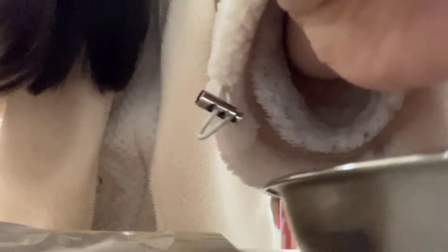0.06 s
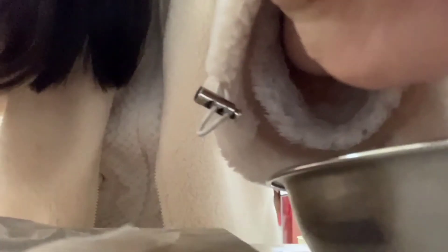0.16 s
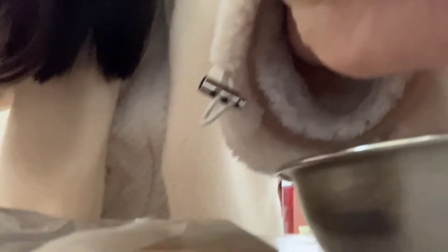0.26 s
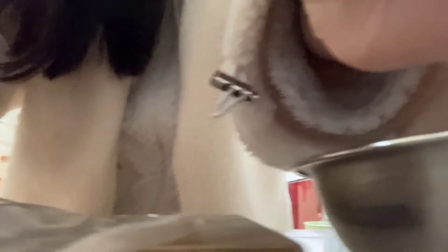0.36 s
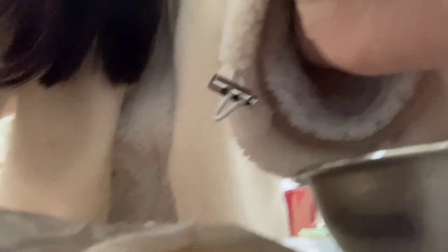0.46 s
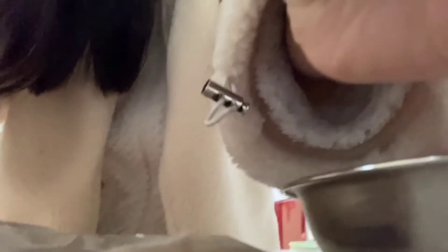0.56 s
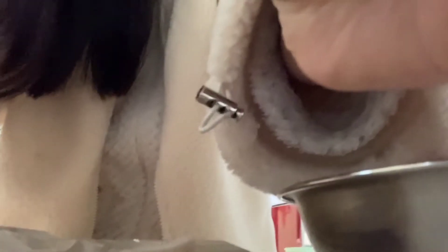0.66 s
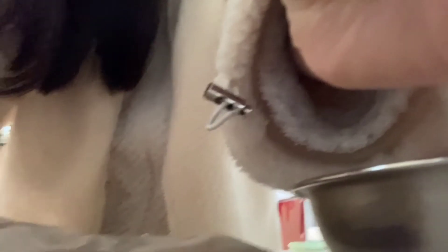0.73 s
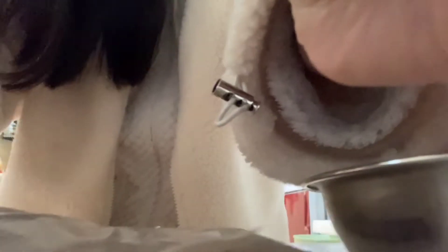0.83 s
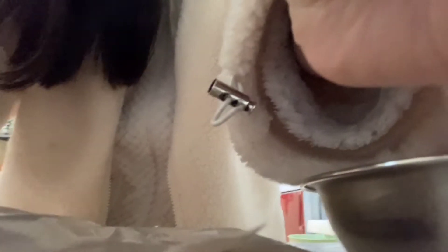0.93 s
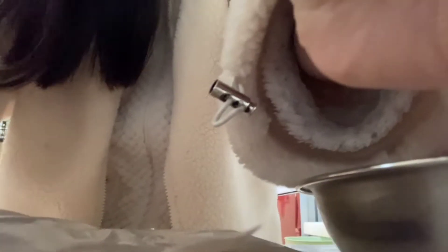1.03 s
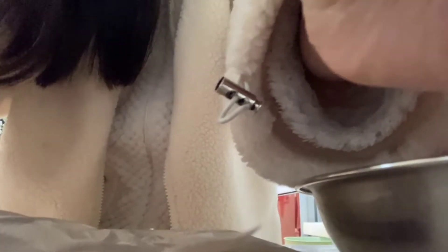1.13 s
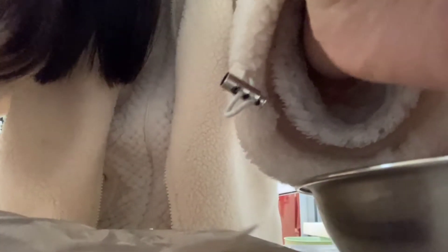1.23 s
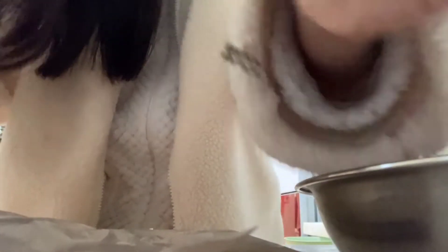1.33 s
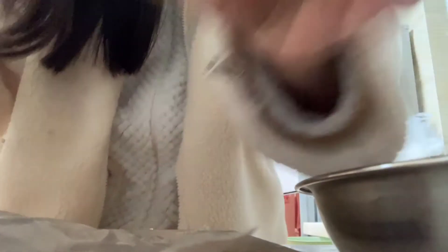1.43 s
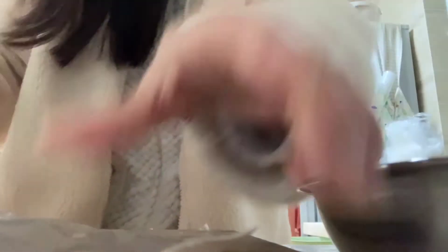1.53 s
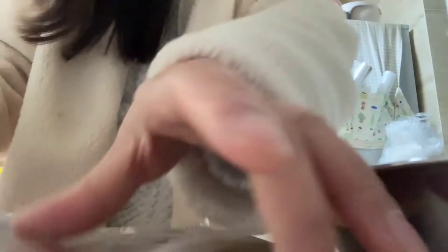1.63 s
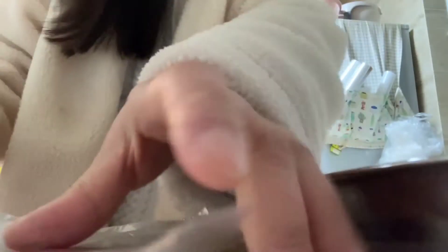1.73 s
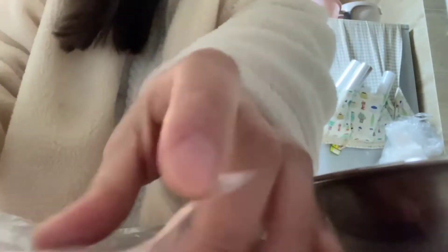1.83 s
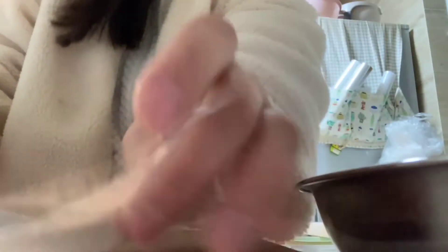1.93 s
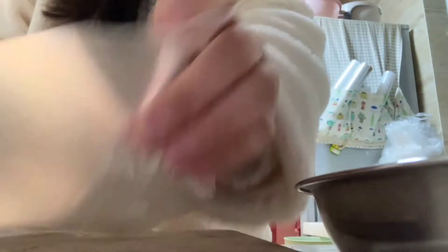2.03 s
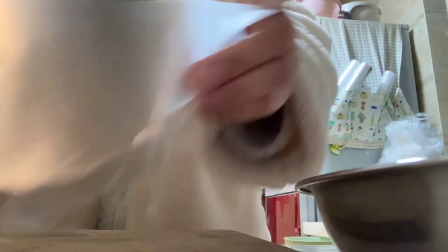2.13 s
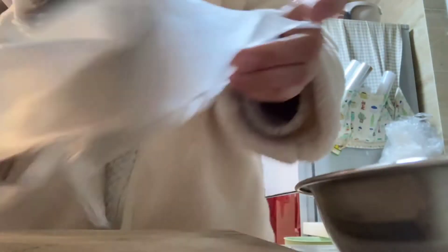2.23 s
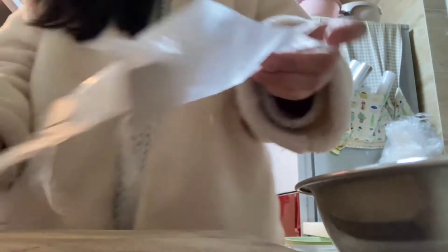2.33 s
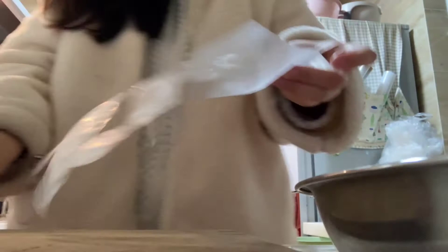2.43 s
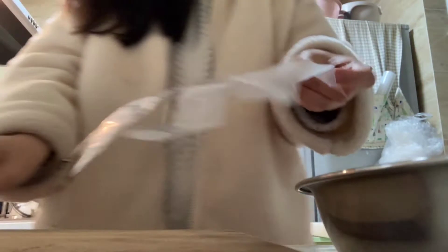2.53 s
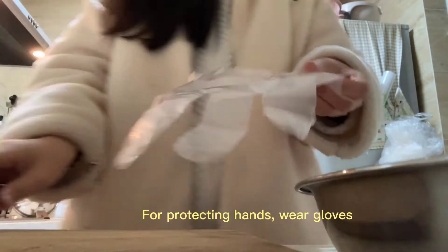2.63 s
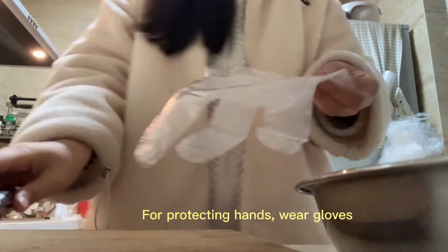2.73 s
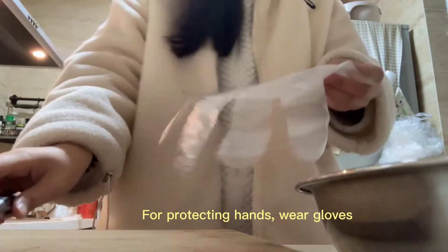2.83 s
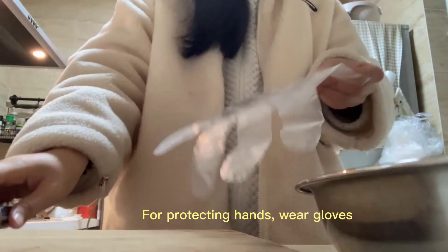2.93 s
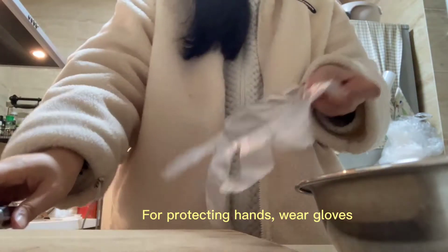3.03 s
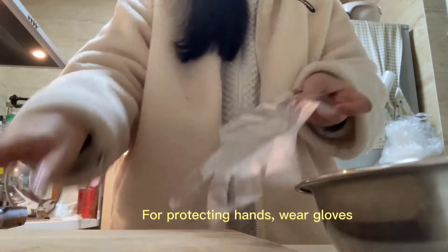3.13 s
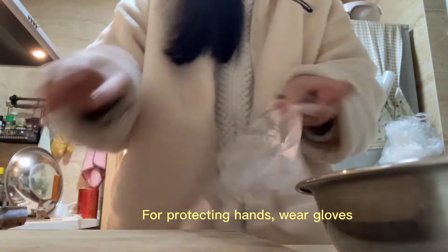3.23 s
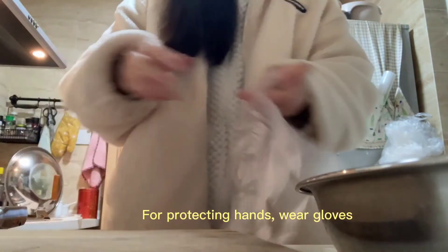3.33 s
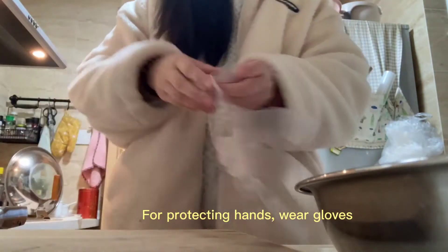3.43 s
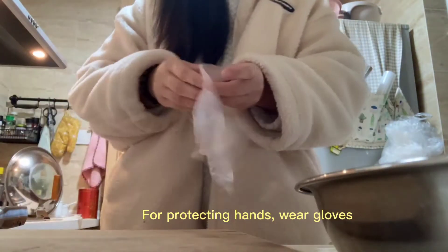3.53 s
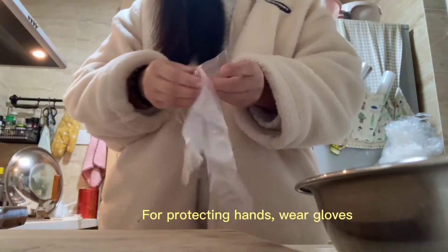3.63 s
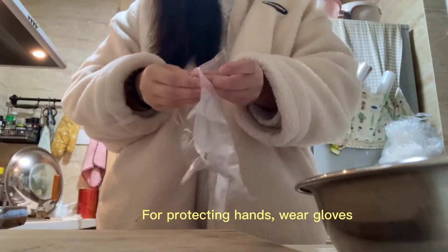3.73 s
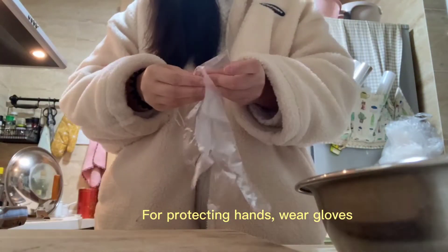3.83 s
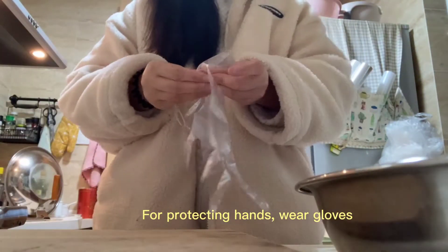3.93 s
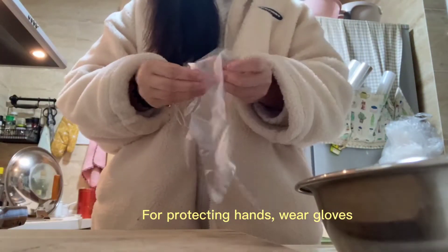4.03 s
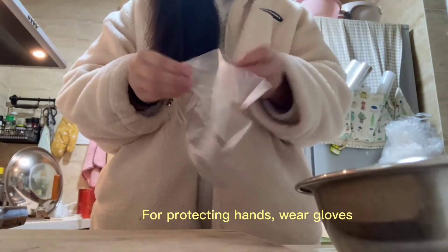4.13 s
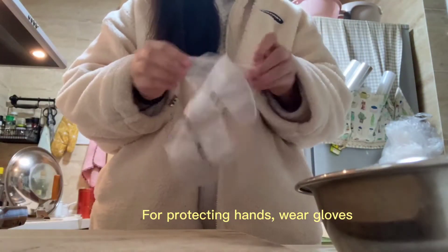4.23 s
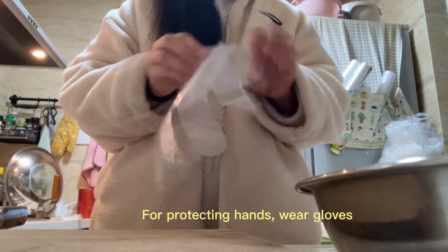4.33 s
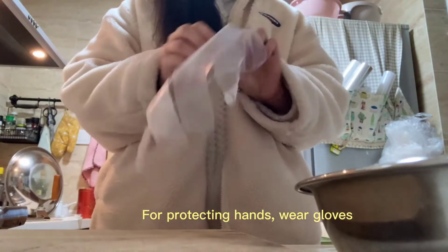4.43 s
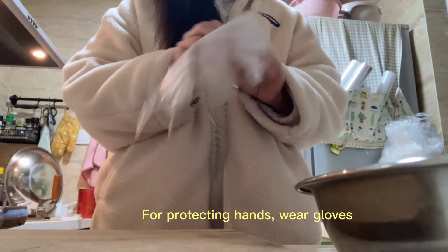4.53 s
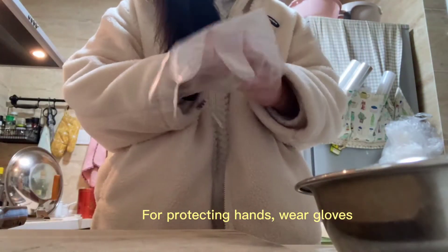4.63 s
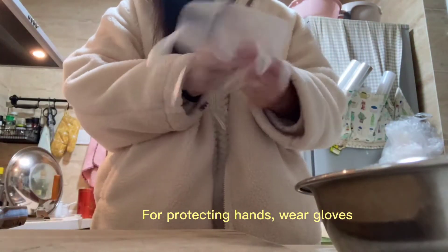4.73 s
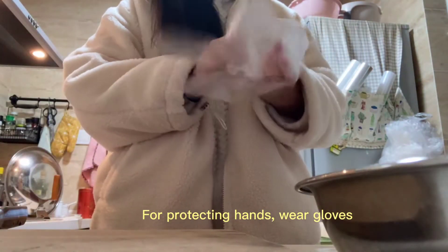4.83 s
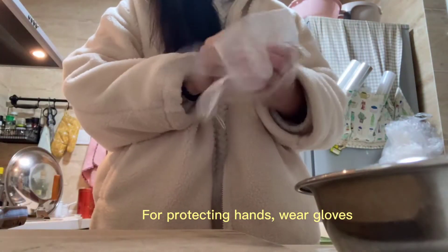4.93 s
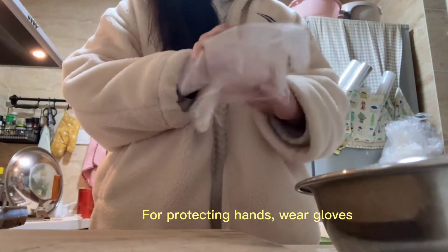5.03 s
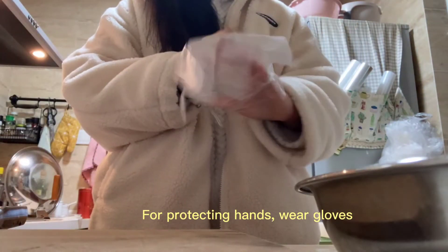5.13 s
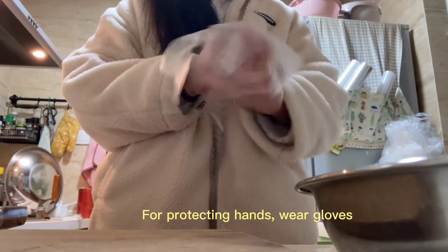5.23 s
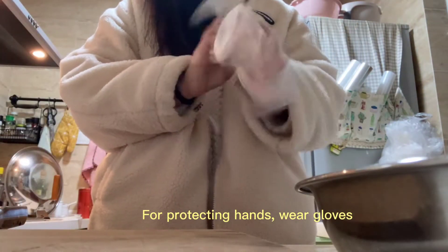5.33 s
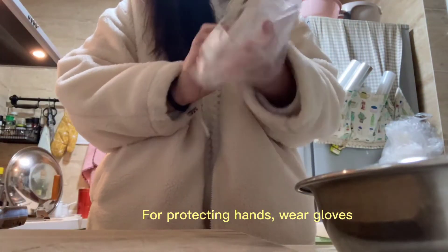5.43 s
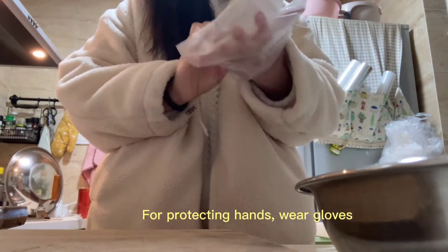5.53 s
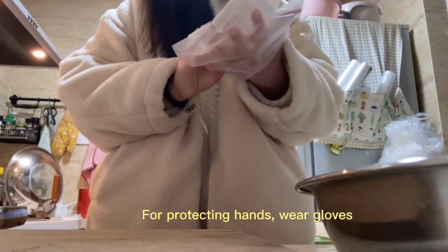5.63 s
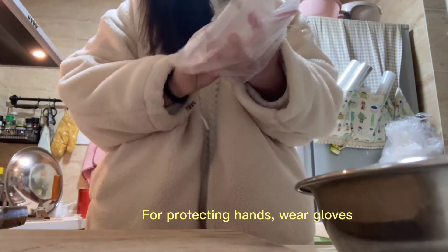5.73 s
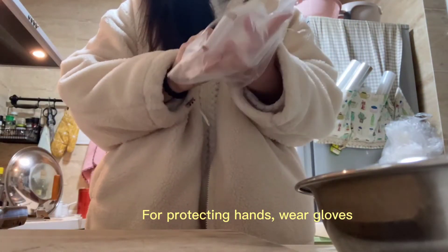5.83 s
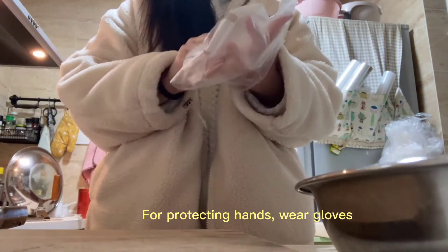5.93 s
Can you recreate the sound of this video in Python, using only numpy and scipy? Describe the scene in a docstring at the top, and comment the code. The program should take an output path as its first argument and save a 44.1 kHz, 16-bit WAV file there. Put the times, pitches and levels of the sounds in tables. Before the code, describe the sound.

Soft hand thuds and barely audible film rubbing on a wooden counter open the scene. Around two seconds a thin glove rustles and snaps at the left as cloth brushes past. A sharp wooden knock with a tiny chatter follows, by far the loudest event. Then the glove crackles in bright, irregular bursts in front, close to the microphones, with short room reflections.

```python
"""Thin plastic glove on a wooden counter

A thin plastic glove slides on a kitchen counter, is lifted, carried to the front and pulled at by fingers.
Random impulses are its buckling creases; coloured clicks are its sharper folds snapping through.
Hands bump the wood and one hard thing lands on it: dispersive bending waves, scattering and ringing modes.
Sleeves brush past as shaped noise, and a small room answers over a steady low rumble of noise."""
import sys
import numpy as np
from scipy import signal
from scipy.fft import rfft, irfft, next_fast_len
from scipy.io import wavfile
from scipy.ndimage import uniform_filter1d, map_coordinates

SR = 44100
rng = np.random.default_rng(int(sys.argv[2]) if len(sys.argv) > 2 else 0)


def digitize_waveform(pressure):
    """Quantize a signal to 16-bit integers and store it at the path in sys.argv[1].

    Rows of a 2-D input are taken as channels; values are limited to [-1, 1].
    """
    field = np.atleast_2d(pressure).T
    bounded = np.clip(field, -1, 1)
    quanta = np.round(bounded * 32767).astype(np.int16)
    wavfile.write(sys.argv[1], SR, quanta)


N = 263277  # length in samples


def amp(db):
    """Logarithmic level: decibels to amplitude gain."""
    return 10 ** (np.asarray(db) / 20)


def unit(x):
    """Normalisation by mean power: x at rms 1."""
    return x / np.sqrt(np.mean(x ** 2) + 1e-20)


def along(points, hz):
    """Logarithmic frequency scale: (Hz, value) points interpolated on it."""
    point_hz, value = np.transpose(points)
    return np.interp(np.log(hz + 1), np.log(point_hz + 1), value)


def wobble(rate):
    """Slow random modulation: straight lines between normal random knots, rate of them a second."""
    knots = rng.standard_normal(int(N * rate / SR) + 4)
    return map_coordinates(knots, [np.arange(N) * rate / SR], order=1)


def filtered(x, response):
    """Linear filtering: the spectrum of x times a response of frequency."""
    size = next_fast_len(N + SR // 2)
    return irfft(rfft(x, size) * response(np.fft.rfftfreq(size, 1 / SR)), size)[..., :N]


def pulse(spectrum, size=4096):
    """Minimum phase: the most compact causal pulse with this spectrum, at peak 1."""
    hz = np.fft.rfftfreq(size, 1 / SR)
    # folding the cepstrum onto positive times makes the pulse causal
    cepstrum = irfft(np.log(amp(along(spectrum, hz))))
    cepstrum[1:size // 2] *= 2
    cepstrum[size // 2 + 1:] = 0
    h = irfft(np.exp(rfft(cepstrum)))
    return h / np.abs(h).max()


def add(track, s, sound):
    """Superposition: a sound mixed into a track at s seconds."""
    part = track[..., round(s * SR):][..., :sound.shape[-1]]
    part += sound[..., :part.shape[-1]]


def leading(x, radians):
    """Interaural phase: stereo x with the left port ahead by a function of frequency."""
    return filtered(x, lambda hz: np.exp(np.outer([.5j, -.5j], radians(hz))))


# Likeness of left and right in a diffuse field. Each row: frequency in Hz, correlation from -1 to 1.
LIKENESS = [(60, 0.79), (250, 0.73), (600, 0.4), (2000, 0.25), (12000, 0.26)]


def spread(pair):
    """Diffuse-field coherence: unrelated signals made alike in the bass and apart in the treble."""
    def shares(hz):
        likeness = np.clip(along(LIKENESS, hz), -1, 1)
        return np.sqrt((1 + np.outer([1, -1], likeness)) / 2)

    mid, side = filtered(pair, shares)
    return np.array([mid + side, mid - side])


# Reverberation of the kitchen. Each row: frequency in Hz, time to fall by 60 dB in seconds.
KITCHEN_DECAY = [(80, 0.91), (400, 0.44), (2000, 0.23), (6000, 0.14), (14000, 0.095)]


def room(x, wet_db):
    """Reverberation: x plus a diffuse tail in which each frequency decays at its own speed."""
    hz, t, z = signal.stft(rng.standard_normal((2, SR // 2)), SR, nperseg=256)
    decay = amp(-60 * t / along(KITCHEN_DECAY, hz)[:, None])
    tail = signal.istft(z * decay, SR, nperseg=256)[1]
    # the tail starts 4 ms after the direct sound
    tail = np.pad(tail / np.linalg.norm(tail[0]), ((0, 0), (SR // 250, 0)))
    return x + amp(wet_db) * spread(signal.fftconvolve(np.atleast_2d(x), tail, axes=1)[:, :N])


def rush(spectrum):
    """Broadband random sound: stereo noise of rms 1 with the shape of a spectrum."""
    noise = spread(rng.standard_normal((2, N)))
    return unit(filtered(noise, lambda hz: amp(along(spectrum, hz))))


# Spectrum of the low rumble. Each row: frequency in Hz, relative density in dB per Hz.
AIR_SPECTRUM = [(25, -32), (55, -5), (100, 3.5), (150, -4.5), (220, -14), (400, -17), (700, -15.5),
                (1500, -30.5), (5000, -42), (15000, -67)]


def kitchen_air():
    """Stationary noise: the steady air of the kitchen, strongest in the bass."""
    return amp(-60.5) * rush(AIR_SPECTRUM)


RISE_DB_PER_S, FALL_DB_PER_S = 268, 188  # how fast a movement starts and dies away at brisk=1


def movement(start, length, db, brisk=1):
    """Exponential growth and decay: the power of one movement that swells, holds and dies away."""
    t = np.arange(N) / SR
    rise = RISE_DB_PER_S * np.maximum(start - t, 0)
    fall = FALL_DB_PER_S * np.maximum(t - start - length, 0)
    return amp(db - brisk * (rise + fall)) ** 2


def strengths(rows, brisk=1):
    """Addition of powers: gains of the fizz and of the lower layer for a table of movements."""
    powers = np.array([movement(*row[:3], brisk) for row in rows])
    lower_over_fizz = amp([row[3] for row in rows])
    return np.sqrt(powers.sum(0)), np.sqrt(lower_over_fizz ** 2 @ powers)


# Spectrum of brushing cloth. Each row: frequency in Hz, relative density in dB per Hz.
CLOTH_SPECTRUM = [(40, 7), (90, 10), (250, 0), (600, -9), (1200, -8.5), (2500, -71), (8000, -49)]
# Sleeves brushing the counter. Each row: start of the hold in seconds, its length in seconds,
# level in dB before the random wobble.
SLEEVE_STROKES = [(.02, .5, -55.5), (0.818, 0.21, -57.5), (1.66, 0.56, -57), (2.002, 0.31, -46.5),
                  (2.732, 0.063, -48.5), (3.3, 0.41, -58.5)]


def sleeves():
    """Frictional noise: cloth brushes over the counter with an uneven level."""
    stroke = np.sqrt(sum(movement(*row) for row in SLEEVE_STROKES))
    return stroke * amp(2.2 * wobble(25.8)) * rush(CLOTH_SPECTRUM)


def contact(hz, pitch_hz, q):
    """Contact resonance: a hand or thing bouncing on the counter drives it most near one pitch."""
    return 1 / np.sqrt(1 + (q * (hz / pitch_hz - pitch_hz / hz)) ** 2)


# Spectrum of the thud before the contact shapes it. Each row: frequency in Hz, relative level in dB.
THUD_SPECTRUM = [(30, -48), (55, -16), (80, 13), (150, 2), (300, 0.5), (700, -3), (1250, -12),
                 (1700, -22.5), (5000, -38)]


def bending(weight, sweep_s, size=4096):
    """Dispersion of bending waves: treble outruns bass, so the first wave is a falling chirp of peak 1."""
    hz = np.fft.rfftfreq(size, 1 / SR) + 1
    gain = amp(along(THUD_SPECTRUM, hz)) * weight(hz)
    # the delay goes as 1 / sqrt(frequency) and is sweep_s at 100 Hz
    wave = irfft(gain * np.exp(-4j * np.pi * sweep_s * 10 * np.sqrt(hz)))
    return wave / np.abs(wave).max()


def scattered(wave, t60):
    """Multiple scattering: the counter's edges and fittings return the wave as a short dense blur."""
    t = np.arange(SR // 4) / SR
    paths = rng.standard_normal(len(t)) + 0.34 * rng.standard_normal((2, len(t)))
    return signal.fftconvolve(paths * amp(-60 * t / t60), [wave / np.linalg.norm(wave)], axes=1)


# Modes of the wooden counter. Each row: frequency in Hz, relative level in dB before the random spread,
# time to fall by 60 dB in seconds before it is divided by the damping.
COUNTER_MODES = [(74.3, 2, 0.59), (113.25, -2.5, 0.53), (166, -15.5, 0.44), (250, -4.5, 0.14),
                 (269.4, -4, 0.32), (406, -7.5, 0.39), (409.5, -4, 0.2), (518.5, 4, 0.18),
                 (584, -6.5, 0.22), (629, -7, 0.29), (727, -9, 0.14), (788, 2, 0.23), (908, -22.5, 0.16),
                 (946, -8.5, 0.14), (1053, -37, 0.1), (1250, -19, 0.036), (1420, -37, 0.18),
                 (1860, -1.5, 0.1), (2020, -22, 0.2), (2400, -7, 0.12)]


def counter_modes(damping, rise_s):
    """Damped free vibration: each mode as a complex tone that builds up and dies."""
    t = np.arange(SR // 2) / SR
    hz, _, t60 = np.transpose(COUNTER_MODES)[:, :, None]
    build_up = 1 - np.exp(-t / rise_s)
    return amp(-60 * t * damping / t60) * build_up * np.exp(2j * np.pi * hz * t)


def ring(modes, weight):
    """Modal superposition: modes at new strengths, each meeting the two ports at its own phase."""
    hz, db, _ = np.transpose(COUNTER_MODES)
    gain = amp(db + rng.standard_normal(len(hz))) * weight(hz)
    port_phase = 0.19 * np.sqrt(hz / 400) * rng.standard_normal((2, len(hz)))
    phase = 2 * np.pi * rng.random(len(hz)) + port_phase
    return np.imag(gain * np.exp(1j * phase) @ modes) / np.linalg.norm(gain)


def through_counter(x, radians):
    """Phase of a passing bending wave: the left port leads by this at 400 Hz and by less in the bass."""
    return leading(x, lambda hz: radians * np.sqrt(np.minimum(hz, 600) / 400))


# Soft bumps on the counter. Each row: time in seconds, level in dB before the trim of each part,
# contact pitch in Hz, level of blur and ring over the thud in dB before their trims.
HAND_BUMPS = [(0.063, -39.5, 1250, -29), (.210, -41.5, 870, -4), (.226, -35, 1170, -8),
              (.226, -16.5, 179, -16), (.330, -26.5, 240, -1), (0.597, -31.5, 510, -2.5),
              (.600, -26, 201, -15), (.825, -49.5, 270, 8), (0.961, -44, 252, -1.5), (1.182, -44, 424, -21),
              (1.697, -40.5, 141, -7), (2.025, -37, 306, 6.5), (2.079, -36, 190, -6),
              (2.245, -39, 915, 7.5), (2.270, -35, 250, 9.5), (2.296, -38, 114, 6.5),
              (2.316, -39, 273, 8.5), (2.342, -46, 325, 5.5), (2.446, -30, 250, 8.5),
              (2.448, -42.5, 800, 8.5), (2.535, -35, 1010, 2), (2.722, -32, 250, 4), (2.772, -25, 290, 1.5),
              (2.779, -35.5, 119, 12.5), (3.428, -42.5, 105, 0), (3.492, -43.5, 113, 3.5)]


def bumps():
    """Impact excitation: hands and wrists push the counter into a dull thud, its blur and a damped ring."""
    out, modes = np.zeros((2, N)), counter_modes(damping=1.96, rise_s=0.011)
    for s, db, pitch_hz, ring_db in HAND_BUMPS:
        weight = lambda hz: contact(hz, pitch_hz, q=2.93)
        wave = bending(weight, sweep_s=0.01369)
        add(out, s - .002, amp(db - 2.5) * wave)
        add(out, s + 0.00234, amp(db + ring_db - 12.5) * scattered(wave, t60=.14))
        add(out, s + 0.00224, amp(db + ring_db - 2) * ring(modes, lambda hz: weight(hz) ** 2))
    return through_counter(room(out, wet_db=-17.0), radians=0.91)


# the hard landing: time, level before the trims, crack over the thud before the trims
KNOCK_S, KNOCK_DB, CRACK_DB = 3.0734, 1.5, 0
# light touches before it: spacing, level of the last before the trims, growth a touch
GRAZE_GAP_S, GRAZE_DB, GRAZE_SWELL_DB = .0085, -16.5, 3.5


def grazes(count):
    """Growing contact: (s, dB, crack dB) of evenly spaced touches that swell towards the landing."""
    return [(KNOCK_S - GRAZE_GAP_S * (k + 1), GRAZE_DB - GRAZE_SWELL_DB * k, CRACK_DB) for k in range(count)]


# bounces after it: first flight, ratio of each flight to the one before, loss a bounce
CHATTER_GAP_S, CHATTER_SHRINK, CHATTER_LOSS_DB = .0101, .85, 4
CHATTER_CRACK_DB = -31  # the bounces are dull: crack over the thud before the trims


def bounces(count):
    """Inelastic rebound: (s, dB, crack dB) of ever faster, ever weaker bounces."""
    flights = np.cumsum(CHATTER_GAP_S * CHATTER_SHRINK ** np.arange(count))
    return [(KNOCK_S + s, KNOCK_DB - CHATTER_LOSS_DB * (k + 1), CHATTER_CRACK_DB)
            for k, s in enumerate(flights)]


# Spectrum of the hard crack. Each row: frequency in Hz, relative level in dB.
CRACK_SPECTRUM = [(200, 6.5), (600, -5), (1200, -2), (2400, 5.5), (3900, -1.5), (5000, -9), (7000, -23),
                  (16000, -54)]


def knock():
    """Hard impact: a thing grazes the counter, lands with a crack and chatters while the ring builds up."""
    wood, crack = np.zeros((2, N)), np.zeros(N)
    wave = bending(lambda hz: contact(hz, pitch_hz=550, q=0.56), sweep_s=0.00611)
    t = np.arange(SR // 50) / SR
    for s, db, crack_db in grazes(count=3) + [(KNOCK_S, KNOCK_DB, CRACK_DB)] + bounces(count=4):
        add(wood, s, amp(db - 8.5) * wave)
        add(wood, s, amp(db - 16.5) * scattered(wave, t60=0.097))
        # the rough faces grind for a few milliseconds after they meet
        grind = (t == 0) + 0.11 * amp(-60 * t / 0.028) * rng.standard_normal(len(t))
        add(crack, s, amp(db + crack_db - 8.5) * signal.fftconvolve(grind, pulse(CRACK_SPECTRUM)))
    modes = counter_modes(damping=1.55, rise_s=0.0048)
    add(wood, KNOCK_S, amp(-8.0) * ring(modes, lambda hz: contact(hz, pitch_hz=473, q=0.2)))
    # the crack is weaker on the left, though it arrives there 90 microseconds sooner
    crack = room(crack, wet_db=-7) * amp([[-1.7], [1.7]])
    crack = leading(crack, lambda hz: 2 * np.pi * hz * .00009)
    wood = through_counter(room(wood, wet_db=-15.5), radians=1.18) * amp([[-.5], [.5]])
    return wood + crack


# The glove is carried to the middle between these two times in seconds.
CARRY_TIMES = [2.776, 2.9]


def carried():
    """Linear motion: 0 while the glove is near on the left, 1 once it is held in front."""
    return np.interp(np.arange(N) / SR, CARRY_TIMES, [0, 1])


LEFT_LEAD_S = 0.000224  # the glove starts on the left, so its sound reaches that port first
# Phase between the ports for sound from in front. Each row: frequency in Hz, lead of the left in radians.
PORT_PHASE = [(100, 0), (900, .3), (3000, -1), (6000, -3.2), (8100, -.7), (9200, .8), (11000, 3),
              (13200, 5.9), (14400, 6.6), (16000, 9.5)]


def at_ports(sound):
    """Equal-power crossfade: the glove's sound goes from the left to the front of the two ports."""
    centred = carried()
    left = leading(sound, lambda hz: 2 * np.pi * hz * LEFT_LEAD_S)
    front = leading(sound, lambda hz: along(PORT_PHASE, hz))
    return np.sqrt(1 - centred) * left + np.sqrt(centred) * front


# Spectrum of a snapping fold, also of the ticks. Each row: frequency in Hz, relative level in dB.
SNAP_SPECTRUM = [(700, -8.5), (2000, -7.5), (4000, -6), (6000, -6.5), (9000, -6), (11400, -9.5),
                 (13500, -3), (15500, -9), (17500, -23)]
# Single folds snapping through. Each row: time in seconds, level in dB before a common trim, pitch in Hz.
FOLD_SNAPS = [(0.186, -42.5, 8600), (0.2269, -39.5, 6090), (0.5132, -47.5, 5530), (0.5866, -40.5, 4200),
              (0.7519, -40.5, 8750), (0.7685, -41, 4570), (0.795, -40.5, 4360), (0.82, -42.5, 5420),
              (0.953, -39, 3960), (1.0506, -40, 3560), (1.1827, -36.5, 5460), (1.188, -41, 4510),
              (1.2352, -31, 5870), (1.3204, -47.5, 2570), (1.735, -47, 4350), (1.7694, -33, 9000),
              (1.7875, -34, 4800), (1.946, -33.5, 4300), (1.955, -28, 9300), (2.0747, -18, 8300),
              (2.0804, -26, 3880), (2.0976, -32, 4430), (2.1858, -32, 8640), (2.3545, -33.5, 9400),
              (2.385, -29.5, 9800), (2.5643, -32.5, 9770), (2.7018, -35.5, 12300), (2.7447, -32.5, 9700),
              (3.391, -42, 8770), (4.2075, -29.5, 12800), (5.5737, -29.5, 8680)]


def snaps():
    """Snap-through buckling: a fold creaks, flips with a click coloured by its size, and the film shivers."""
    out = np.zeros((2, N))
    t = np.arange(-SR // 200, SR // 40) / SR  # starts before the flip
    hz = np.geomspace(100, SR / 2, 60)
    for s, db, pitch_hz in FOLD_SNAPS:
        bump_db = 8 * np.exp(-(np.log2(hz / pitch_hz) / 0.36) ** 2)
        click = pulse(np.transpose([hz, along(SNAP_SPECTRUM, hz) + bump_db]))
        envelope = 0.29 * amp(-60 * np.abs(t) / 0.0048) + 0.072 * amp(-60 * np.abs(t) / 0.035)
        shiver = envelope * rng.standard_normal((2, len(t)))
        shiver[:, t == 0] = 1  # the flip itself
        add(out, s + t[0], amp(db + .5) * signal.fftconvolve(shiver, [click], axes=1))
    return out


def creases(spectrum, per_second, size_db, facing, patchy_db):
    """Crackling noise: random tiny buckles of rms 1, each with its own facing, each patch its own colour."""
    happens = rng.random(N) < per_second / SR
    sizes = happens * amp(size_db * np.clip(rng.standard_normal(N), -3, 3))
    clicks = sizes * (rng.choice([-1, 1], N) + facing * rng.standard_normal((2, N)))
    z = signal.stft(clicks, nperseg=256)[2]
    # a random field smoothed over frequency, then time, colours the patches
    field = uniform_filter1d(rng.standard_normal(z.shape[1:]), size=9, axis=0)
    field = uniform_filter1d(field, size=4, axis=1)
    clicks = signal.istft(z * amp(patchy_db * unit(field)), nperseg=256)[1][:, :N]
    return unit(filtered(clicks, lambda hz: amp(along(spectrum, hz))))


# Spectra of small creases, of the lifted sheet and of film rubbing on the counter.
# Each row: frequency in Hz, relative density in dB per Hz.
FIZZ_SPECTRUM = [(3000, -12), (5000, -3.5), (6500, -5), (7600, -6), (8500, -1), (10000, 0.5), (11400, -9),
                 (13000, -1.5), (14300, -7.5), (16000, -11)]
RUSTLE_SPECTRUM = [(80, -18.5), (200, -7), (500, 1.5), (1000, 0), (1500, -0.5), (2300, 2.5), (3200, -1),
                   (4400, -3), (6500, -9), (10000, -5.5)]
RUB_SPECTRUM = [(200, -19), (700, -1), (1300, 4.5), (1800, 0.5), (2900, -2), (4300, 0.5), (6000, -2),
                (10000, -13.5)]
# The glove slides on the counter, fingers pull at the lifted glove, and it hangs from the hand and stirs.
# Each row: start of the hold in seconds, its length in seconds, fizz level in dB before the clumps and trim,
# level of the lower layer (rub or rustle) over the fizz in dB before the clumps and trims.
COUNTER_SLIDES = [(.055, .18, -74, 5.5), (.325, 0.084, -70, 5.5), (.44, 0.22, -74.5, 3.5),
                  (.75, 0.1, -70, 2), (.83, 0.14, -65.5, 1), (1.045, 0.18, -72, 2.5), (1.32, 0.018, -80, 8),
                  (1.48, .1, -81.5, 1.5), (1.595, .135, -71.5, -2)]
FINGER_PULLS = [(1.75, 0.031, -56.5, 4), (1.945, 0.083, -53.5, 1), (2.085, 0.16, -48, 0.5),
                (2.32, 0.098, -59.5, -7), (2.53, 0.038, -59.5, 7.5), (2.735, .02, -62, 2.5),
                (2.835, 0.069, -56, -7.5), (3.05, 0.065, -58, 5.5), (3.335, .05, -56.5, -13),
                (3.44, 0.072, -54, -21), (3.595, .05, -48.5, -2.5), (3.71, 0.15, -53, -7),
                (3.89, 0.086, -60, -9), (4.03, 0.083, -51, -6), (4.12, .14, -49.5, -2.5),
                (4.305, 0.046, -40, -4.5), (4.42, 0.055, -49, -3.5), (4.69, 0.15, -44.5, -6),
                (4.875, 0.13, -41, -5.5), (5.08, .2, -40.5, -4.5), (5.365, 0.044, -38.5, -5),
                (5.46, 0.023, -44, -11), (5.54, 0.035, -48, -6.5), (5.66, 0.14, -51.5, -5.5),
                (5.88, 0.069, -48, -7.5)]
HANGING_STIRS = [(1.97, 1.1, -60.5, -5.5), (3.15, 0.27, -63, -6), (3.433, 3.6, -57.5, -2.5)]
SLIDE_BRISK = 1.47  # film on the counter sticks and slips: it starts and stops this many times faster
TICKS_NEAR_DB, TICKS_FAR_DB = -7, -15  # ticks added to the fizz: glove near on the left, held in front


def film():
    """Intermittent buckling: creases give way in clumps that fizz and tick, over a rub or a rustle."""
    slide_fizz, slide = strengths(COUNTER_SLIDES, SLIDE_BRISK)
    pull_fizz, pull = strengths(FINGER_PULLS + HANGING_STIRS)
    clumps_db = 1.3 * wobble(50) + 0.8 * wobble(260)
    fizz = creases(FIZZ_SPECTRUM, per_second=5000, size_db=2.5, facing=0.85, patchy_db=2.0)
    fizz = amp(clumps_db + 1.36) * fizz
    ticks = creases(SNAP_SPECTRUM, per_second=70, size_db=5.5, facing=0.58, patchy_db=3.5)
    ticks = amp(TICKS_NEAR_DB + (TICKS_FAR_DB - TICKS_NEAR_DB) * carried()) * ticks
    sheet = creases(RUSTLE_SPECTRUM, per_second=2400, size_db=2.5, facing=1.0, patchy_db=3)
    rub = creases(RUB_SPECTRUM, per_second=1500, size_db=4, facing=1, patchy_db=4.5)
    lower = amp(2.0) * (pull * sheet + slide * rub)
    # the lower layers follow the clumps less strongly
    return np.hypot(slide_fizz, pull_fizz) * (fizz + ticks) + amp(0.45 * clumps_db) * lower


def scene():
    """Superposition of sources: air, sleeves, counter and glove; most snaps are close, so they are drier."""
    glove = room(at_ports(film()), wet_db=-7.5) + room(at_ports(snaps()), wet_db=-12.5)
    return kitchen_air() + sleeves() + bumps() + knock() + glove


TOP_HZ = 15800  # band limit


def record(dry):
    """Band limitation: nothing is kept from the top frequency upwards."""
    return filtered(dry, lambda hz: hz < TOP_HZ)


dry = scene()
out = record(dry)
digitize_waveform(out)
```